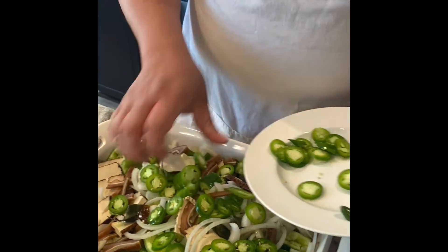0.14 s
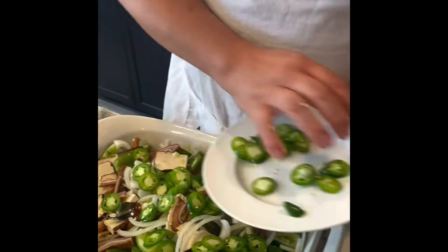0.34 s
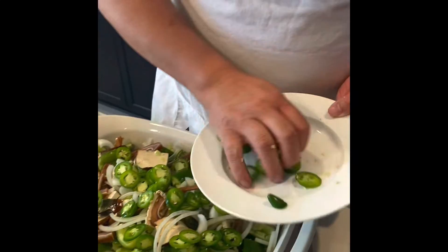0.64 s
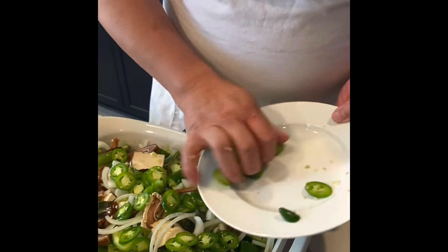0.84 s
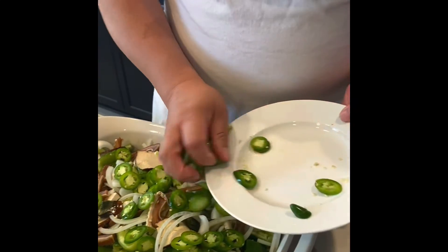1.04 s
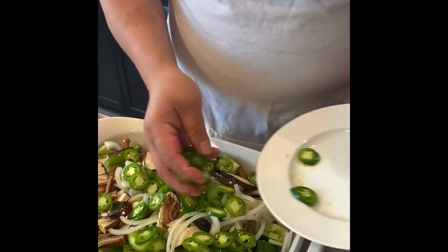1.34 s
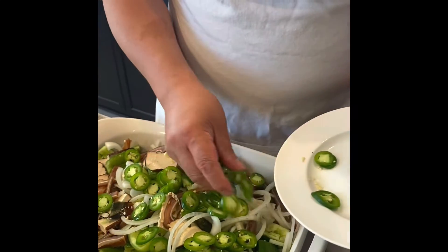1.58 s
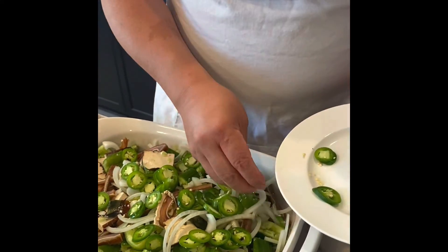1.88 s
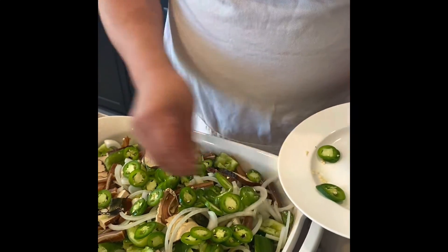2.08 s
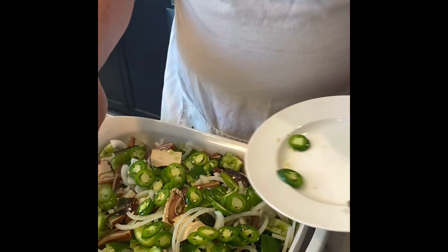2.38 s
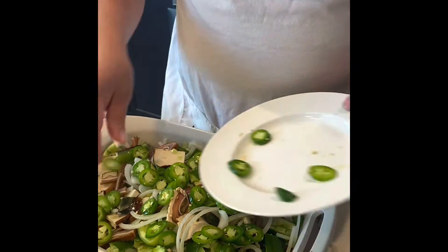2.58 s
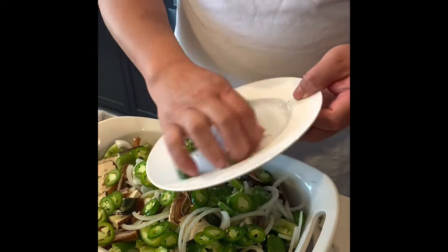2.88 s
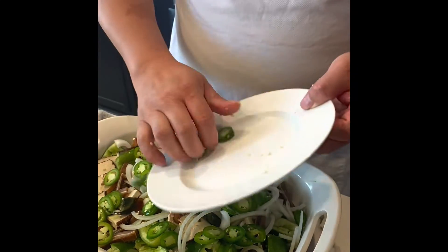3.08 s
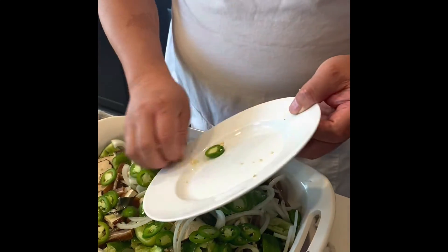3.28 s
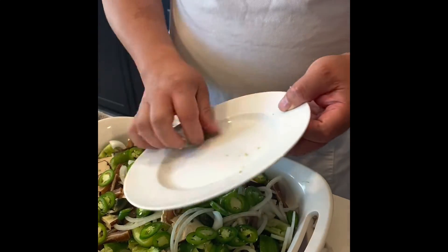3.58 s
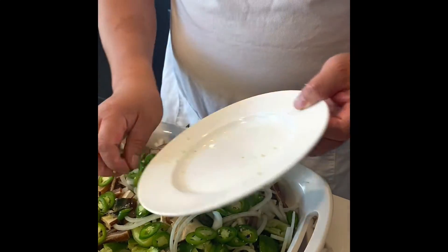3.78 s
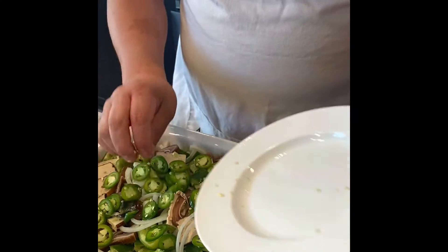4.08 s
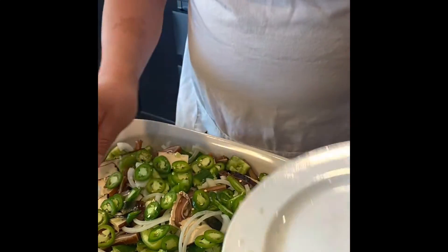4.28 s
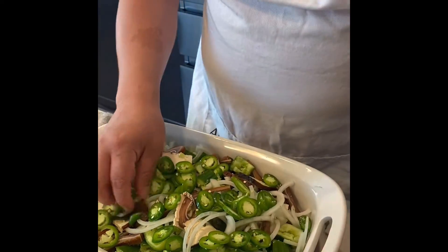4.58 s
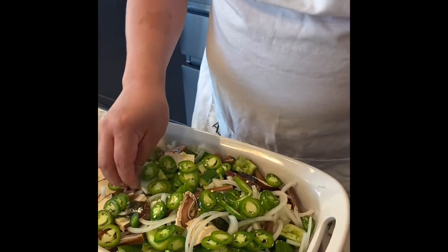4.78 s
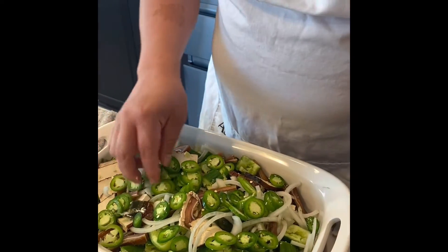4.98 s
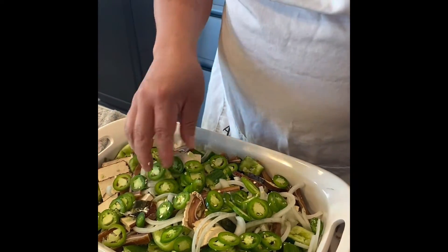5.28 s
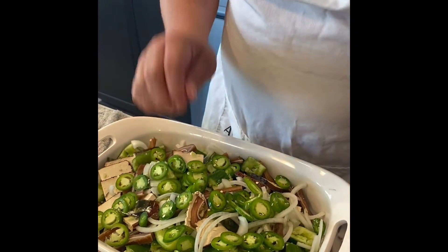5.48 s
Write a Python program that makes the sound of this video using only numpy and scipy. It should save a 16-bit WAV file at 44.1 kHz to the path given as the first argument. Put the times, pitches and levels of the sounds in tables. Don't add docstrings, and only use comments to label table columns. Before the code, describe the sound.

Light ceramic ticks and faint rubbing as food is swept off a hand-held plate, then one hard knock and a rattle as it is set down.

```python
import sys
import numpy as np
from scipy import signal
from scipy.fft import rfft, irfft, next_fast_len
from scipy.io import wavfile

SR = 44100
rng = np.random.default_rng(int(sys.argv[2]) if len(sys.argv) > 2 else 0)


def dump_mix(stems):
    frames = np.atleast_2d(stems).T
    limited = np.clip(frames, -1, 1)
    pcm = np.round(limited * 32767).astype(np.int16)
    wavfile.write(sys.argv[1], SR, pcm)


def gain_from_db(level_db):
    decades = np.asarray(level_db, float) / 20
    return 10 ** decades


N = 248724

PLATE_HZ = [1750, 2439, 2513, 2730, 3700, 3737, 3786, 3830, 4365, 4710, 5300, 5420, 5500, 5765, 6720, 7050,
            7750, 8275, 10300, 10900, 12000, 13000, 14900, 15700]
# level in the hand/dB, t60 in the hand/s, level on the counter/dB, t60 there/s, left lead/rad
PLATE_RING = [(-10, 0.14, -13, 0.32, 0.48), (-4, 0.069, -13, 0.038, 2.5), (-4, 0.037, 2, 0.034, 0.47),
              (-5.5, 0.2, -6.5, 0.17, 1.17), (-5.5, 0.1, -2, 0.054, 0.94), (-18, .08, -7, 0.069, 1.3),
              (-9, 0.086, -2.5, 0.1, 3.86), (-23, 0.057, -2, 0.072, 1.4), (-7.5, 0.033, -11, 0.098, 0.33),
              (-10, 0.086, -29, .1, 1.8), (-8.5, 0.036, -13, .1, 4.5), (-11, 0.088, 11.5, 0.041, 2.2),
              (-6.5, 0.04, -2, 0.083, 0.7), (-6.5, 0.078, 7, 0.036, 0.41), (-12.5, 0.087, -5.5, 0.12, 0.87),
              (-15, 0.059, -37, .06, 2.2), (-12, 0.11, -25.5, 0.093, 2.2), (-16, 0.061, -16.5, .12, 0.68),
              (-25, .06, -29, 0.1, 2.8), (-32, .05, -18, .12, 4.3), (-17, 0.031, -19.5, 0.084, 1),
              (-36, .05, -18.5, 0.079, 3.55), (-54, 0.063, -32, .1, 1.6), (-54, .04, -38, .14, 1.6)]
FAMILY_EDGES = [2200, 3200, 5000]
SCATTER_DB, SCATTER_RAD = 2.0, 0.35


def ticks():
    # t/s, peak level/dB, drive of the lowest mode/dB, of the next three/dB, of all higher ones/dB
    touches = [(0.314, -64.5, -14, 5, -18), (0.3424, -46.5, -28, -16, -12), (0.4401, -34, -12, -5, -6),
               (0.531, -31.5, -29, -37, -15), (0.652, -31.5, -8, -6, -6), (0.7566, -50.5, -5.5, -15, -11),
               (0.9588, -37, -30, -3, -9), (1.096, -53.5, -6, -22, -4.5), (1.1708, -52, -4, -11.5, -22),
               (2.477, -53.5, -3, -23, -15), (2.8405, -33.5, -17, -24, -17.5),
               (2.8704, -43, -9.5, -24, -12), (3.1493, -47.5, -7.5, -12, -3),
               (3.1705, -36.5, -20, -31, -15), (3.2, -42, -22, -19, -19), (3.2315, -39, -6, -7, -11),
               (3.3604, -54.5, -24, -7, -13), (3.578, -33.5, -22, -24, -17.5), (3.592, -38.5, -20, -12, -9),
               (3.645, -45.5, -33, -31, -8), (3.7199, -48, -23, -16, -7.5), (3.7529, -45, -9, -22, -13),
               (3.774, -47, -21, -24, -11), (4.8699, -49, -5, -14, -11.5)]
    # t/s, factor on t60
    grip = [(.3, 1.2), (.44, 0.85), (.66, 0.9), (.96, 0.2), (1.17, 1.5), (2.85, 1.1), (3.15, 1.26),
            (3.24, 0.94), (3.6, 0.73), (3.78, 1.14)]
    times, peaks_db = np.transpose(touches)[:2]
    out = cracks(times, peaks_db - 10, hz=2460, spread=3.0, decay_s=0.0013)
    chances = rng.standard_normal((len(touches), 2 * len(PLATE_RING)))
    for (s, peak_db, *family_db), luck in zip(touches, chances):
        freedom = np.interp(s, *np.transpose(grip))
        for k, (hz, (held_db, t60, _, _, lead)) in enumerate(zip(PLATE_HZ, PLATE_RING)):
            drive_db = family_db[np.searchsorted(FAMILY_EDGES[:2], hz)]
            level_db = peak_db + drive_db + held_db + 1 + 1.2 * SCATTER_DB * luck[k]
            phase_lead = lead + SCATTER_RAD * luck[-k - 1]
            add_mode(out, s, level_db, hz, t60 * freedom, phase_lead, rise_cycles=2.35)
        push_db = peak_db + family_db[0]
        add_mode(out, s, push_db + 5.5, 820, 0.03, -2.8, rise_cycles=0.57)
        add_mode(out, s, push_db + 4.5, 1250, 0.02, -2.1, rise_cycles=0.88)
    return out * gain_from_db([[-1.2], [1.2]])


def set_down():
    # t/s, counter knock level/dB, plate ring level/dB, extra ring of the middle modes/dB
    blows = [(4.9269, -30, -36, -1), (4.9370, -7.5, -24, 7), (4.946, -51, -37, 18), (4.9635, -30, -58, 2),
             (5.285, -45.5, -76.5, 0), (5.295, -46, -75, -10), (5.308, -41, -82, 3), (5.353, -54, -75, -3),
             (5.366, -37.5, -68, -7), (5.37, -35, -64.5, -1), (5.375, -23, -55, 12.5),
             (5.407, -28.5, -40, 3), (5.414, -14.5, -23.5, 0), (5.4534, -13.5, -20, -5.5),
             (5.4724, -16.5, -32.5, 4), (5.4765, -10, -16.5, -12), (5.485, -20.5, -18.5, -7),
             (5.493, -16, -28.5, 9.5), (5.5036, -11.5, -27.5, 9.5), (5.5083, -49, -26.5, -13.5)]
    # f/Hz, level/dB, t60/s, left lead/rad
    counter = [(897, -2.5, 0.032, -4.5), (959, -10.5, 0.063, 1.5), (1036, 5, 0.026, -2.5),
               (1107, -7.5, 0.064, -1.5), (1200, -11.5, 0.05, 3), (1338, 1.5, 0.017, 3.5),
               (1466, -18, 0.042, 5), (1630, -12.5, 0.04, 1), (1782, -9, 0.023, -5), (1886, -5, 0.018, 2),
               (2095, -18.5, 0.033, 0.7), (2230, 2.5, 0.0068, 11), (2690, -40, 0.0048, -7)]
    # f/Hz, level/dB, t60/s, left lead/rad
    cabinet = [(107.3, -2.5, 0.14, -0.33), (141, 2, 0.091, -0.7), (234.4, 1.5, 0.1, -0.32),
               (327, -0.5, 0.08, -0.6), (538, 7.5, 0.046, -1.7)]
    rocking_from_s, top_modes_hz = 5.2, 12500
    flat_top_db, rocking_top_db, flat_shine_db = -14, 12, 16.5

    times, knocks_db = np.transpose(blows)[:2]
    highs_db = -12 + 2 * knocks_db
    out = cracks(times, 1.57 * knocks_db + 1, hz=2540, spread=1.22, decay_s=0.00028)
    out += cracks(times, highs_db + 3, hz=5500, spread=1.37, decay_s=0.0017)
    out += cracks(times, 2.03 * knocks_db - 3.5, hz=2180, spread=1.87, decay_s=0.0073)

    chances = rng.standard_normal((len(blows), 50))
    for (s, knock_db, low_db, middle_db), high_db, luck in zip(blows, highs_db, chances):
        dull_db = 0.45 * (knock_db + 14.0)
        for k, (hz, level_db, t60, lead) in enumerate(counter):
            strength_db = knock_db + level_db + dull_db * np.log2(hz / 1000) + SCATTER_DB * luck[k]
            add_mode(out, s, strength_db, hz, t60, lead + SCATTER_RAD * luck[k + 1], rise_cycles=1.95)

        thud_db = -24 + 1.07 * knock_db
        for hz, level_db, t60, lead in cabinet:
            add_mode(out, s, thud_db + level_db, hz, t60, lead, rise_cycles=0.93)

        ring_db = low_db, low_db + middle_db, high_db
        for k, (hz, (_, _, level_db, t60, lead)) in enumerate(zip(PLATE_HZ, PLATE_RING)):
            family_db = ring_db[np.searchsorted(FAMILY_EDGES[1:], hz)]
            if s > rocking_from_s:
                family_db += rocking_top_db * (hz > top_modes_hz)
            else:
                family_db += flat_top_db * (hz > top_modes_hz)
                family_db += flat_shine_db * (7400 < hz < 11500)
            strength_db = family_db + level_db + SCATTER_DB * luck[-k - 1]
            phase_lead = lead + SCATTER_RAD * luck[-k - 2]
            add_mode(out, s, strength_db, hz, t60, phase_lead, rise_cycles=10.9)
    return out * gain_from_db([[-1.3], [1.3]])


def snaps():
    # t/s, peak level/dB, centre f/Hz, decay/s
    releases = [(0.533, -46, 7040, 0.00081), (0.466, -42.5, 1130, 0.0006), (0.544, -50, 1500, 0.00052),
                (0.753, -47, 1280, 0.0005), (0.945, -44.5, 9600, 0.0071), (0.974, -47, 7100, 0.0015),
                (1.6172, -57, 12000, 0.0016), (1.84, -55, 5970, 0.0022), (3.645, -59, 6000, .001),
                (3.659, -46, 5500, 0.0011), (3.6825, -39, 6000, 0.0016), (3.688, -58, 11000, 0.0048),
                (4.2294, -62, 12000, 0.0012), (4.586, -56, 5000, 0.0013)]
    return sum(cracks([s], [peak_db], hz, spread=1.42, decay_s=decay_s)
               for s, peak_db, hz, decay_s in releases)


def drag():
    # start t/s, hold/s, level/dB
    strokes = [
        (.35, 0.033, -76.5),
        (.78, .22, -71.5),
        (1.2, 0.31, -81),
        (1.98, .06, -73.5),
        (2.83, 0.35, -70),
        (3.28, .06, -68),
        (3.76, 0.021, -85),
        (4.25, 0.9, -75.5),
    ]
    grit = rng.standard_normal((2, N)) * held(gain_from_db(4.5 * drift(25.0)))
    out = np.zeros((2, N))
    for hz, (held_db, t60, *_) in zip(PLATE_HZ[:15], PLATE_RING):
        radius = gain_from_db(-60 / (t60 * SR))
        out += gain_from_db(held_db) * resonate(grit, hz, radius) * hz * np.sqrt(1 - radius)
    return swells(strokes, rise=73, fall=31.5) * rms_one(out)


def swish():
    # start t/s, hold/s, first f/Hz, last f/Hz, level/dB
    slides = [
        (0, 0.035, 5820, 5980, -72),
        (0.246, 0.12, 2450, 2900, -78),
        (.3, .05, 5300, 5600, -80),
        (1.17, 0.12, 4120, 4080, -68.5),
        (2.056, 0.17, 4120, 4120, -75),
        (2.68, 0.26, 4120, 4270, -71),
        (4.05, 0.101, 5920, 5710, -72),
        (4.416, 0.17, 5750, 5730, -84),
        (4.591, 0.085, 4040, 3990, -66.5),
        (5.219, 0.21, 5330, 5850, -73.5),
    ]
    out, t = np.zeros((2, N)), np.arange(N) / SR
    low_pass = signal.butter(2, 230, fs=SR, output="sos")
    band = rms_one(signal.sosfilt(low_pass, rng.standard_normal((2, 2, N))))
    for s, hold, first_hz, last_hz, level_db in slides:
        span = slice(round(max(s - 0.3, 0) * SR), round((s + hold + 0.3) * SR))
        pitch = np.interp(t[span], [s, s + hold], [first_hz, last_hz])
        phase = 2 * np.pi * np.cumsum(pitch) / SR
        gain = swells([(s, hold, level_db)], rise=108.5, fall=108.5)[span]
        out[:, span] += gain * (band[0][:, span] * np.cos(phase) + band[1][:, span] * np.sin(phase))
    return out


def rustle():
    # t/s, level/dB
    activity = [(0.0, -74.5), (0.12, -72), (0.24, -80.5), (0.44, -68.5), (0.56, -75), (0.88, -65),
                (1.03, -71), (1.21, -70), (1.54, -74.5), (1.66, -88), (1.86, -68.5), (2.12, -66.5),
                (2.5, -72.5), (2.9, -66.5), (3.45, -72.5), (4.1, -68), (4.4, -71.5), (5.64, -70)]
    # f/Hz, level/dB per Hz
    body_colour = [(900, -10), (1300, 5), (1900, 3), (2500, 4.5), (3200, 2), (4000, 4), (4800, -16.5),
                   (5800, 9), (6800, -13.5), (8600, -14)]
    # f/Hz, level/dB per Hz
    sheen_colour = [(5000, 1), (7000, 1.5), (9000, -5), (11000, -3.5), (12500, -19), (14200, -8),
                    (15500, -5), (16600, -14)]
    # start t/s, hold/s, level/dB
    passes = [(.08, 0.03, -82), (.4, 0.091, -71.5), (.65, .03, -81), (.87, 0.078, -70.5),
              (1.07, 0.23, -73.5), (1.53, 0.018, -78), (1.86, 0.028, -76), (2.08, 0.064, -77.5),
              (2.29, .05, -78.5), (2.74, 0.14, -74.5), (3.17, 0.14, -78.5), (3.62, 0.12, -71.5),
              (4.52, 0.15, -72), (4.83, 0.081, -77), (5.3, .2, -90)]
    level_db = np.interp(np.arange(N) / SR, *np.transpose(activity)) + 3
    body = gain_from_db(level_db) * coloured(body_colour, patchy_db=1.1, rate=6.0)
    sheen = gain_from_db(4) * coloured(sheen_colour, patchy_db=2.2, rate=14.0)
    return body + sheen * swells(passes, rise=213, fall=168)


def kitchen(hits):
    # f/Hz, t60/s, level/dB
    decay = [(153, 0.24, 1.5), (543, 0.32, 2), (960, 0.42, -14), (1950, 0.44, -11), (3980, 0.47, -13.5),
             (8100, 0.36, -3), (15000, 0.11, -17)]
    t = np.arange(SR // 2) / SR
    tail = np.zeros((2, len(t)))
    for hz, band in bands(76.2, 17000, size=len(t)):
        tail += gain_from_db(at_hz(decay, hz, column=2) - 60 * t / at_hz(decay, hz)) * band
    tail = tail * (1 - np.exp(-t / 0.00052)) * gain_from_db(-32.5)
    return signal.fftconvolve(tail, hits[1:], axes=1)[:, :N]


def hum():
    # f/Hz, width/Hz, rms level/dB
    room_modes = [(34.9, 1.9, -85.5), (75.1, 9.1, -60.5), (121.52, 4.5, -58), (155.6, 5, -68.5),
                  (190.1, 5.5, -70.5), (239.6, 34, -71.5), (289.3, 3.5, -71)]
    out = np.zeros((2, N))
    for hz, width_hz, level_db in room_modes:
        noise = rng.standard_normal((2, N + SR))
        mid, side = resonate(noise, hz, np.exp(-np.pi * width_hz / SR))[:, SR:]
        out += gain_from_db(level_db) * rms_one(ports(mid, side, hz))
    return out


def room_air():
    # f/Hz, level/dB per Hz
    air_colour = [(12, -50), (20, -13.5), (66, -4.5), (120, -1), (171, -12.5), (290, -12), (395, -15.5),
                  (514, -13), (978, -24.5), (1160, -20.5), (4100, -56.5), (4840, -60.5), (6000, -61.5),
                  (7800, -49), (13200, -120)]
    return gain_from_db(-56.0) * coloured(air_colour[1:-1], patchy_db=1.68, rate=6.6)


def add_mode(out, s, level_db, hz, t60, lead, rise_cycles):
    start = round(s * SR)
    audible_s = np.clip((level_db + 105) / 60, 0, 1.1) * t60
    t = np.arange(min(int(audible_s * SR), N - start)) / SR
    shape = gain_from_db(level_db - 60 * t / t60) * (1 - np.exp(-t * hz / rise_cycles))
    out[:, start:start + len(t)] += shape * np.sin(2 * np.pi * hz * t + lead * np.array([[0.5], [-0.5]]))


def cracks(times, levels_db, hz, spread, decay_s):
    out, size = np.zeros((2, N)), SR // 40
    noises = rng.standard_normal((len(times), 2, size))
    for s, level_db, noise in zip(times, levels_db, noises):
        out[:, round(s * SR):][:, :size] += gain_from_db(level_db) * burst(size, noise, hz, spread, decay_s)
    return out


def burst(size, noise, hz, spread, decay_s):
    t = np.arange(size) / SR
    sos = signal.butter(3, [hz / spread, min(hz * spread, 16500)], "band", fs=SR, output="sos")
    puff = signal.sosfilt(sos, ports(*noise, hz) * t * np.exp(-t / decay_s))
    return puff / np.abs(puff).max()


def resonate(x, hz, radius):
    return signal.lfilter([1, 0, -1], [1, -2 * radius * np.cos(2 * np.pi * hz / SR), radius ** 2], x)


def coloured(spectrum, patchy_db, rate):
    together = drift(rate / 4)
    out = np.zeros((2, N))
    for hz, band in bands(spectrum[0][0], spectrum[-1][0], size=N):
        flicker_db = patchy_db * (0.6 * together + drift(rate))
        out += held(gain_from_db(at_hz(spectrum, hz) + flicker_db)) * band
    return rms_one(out)


def bands(low_hz, high_hz, size):
    edges = low_hz * 2 ** np.arange(0, np.log2(high_hz / low_hz), 1 / 3)
    white = rng.standard_normal((2, 2, size))
    for k, (low, high) in enumerate(zip(edges, edges[1:])):
        sos = signal.butter(2, [low, high], "band", fs=SR, output="sos")
        mid, side = signal.sosfilt(sos, white[k % 2])
        centre = np.sqrt(low * high)
        yield centre, ports(mid, side, centre)


def ports(mid, side, hz):
    # f/Hz, correlation
    likeness = [(20, 0.79), (60, 1), (100, 1), (150, 0.86), (290, 0.71), (640, -0.82), (1410, 0.1),
                (3100, 0.037), (6820, -0.32), (15000, -0.2)]
    alike = np.clip(at_hz(likeness, hz), -0.99, 0.999)
    return np.sqrt(1 + alike) * mid + np.sqrt(1 - alike) * side * np.array([[1], [-1]])


def swells(rows, rise, fall):
    t = np.arange(0, N + 40, 40) / SR
    levels_db = [db - rise * np.maximum(s - t, 0) - fall * np.maximum(t - s - hold, 0)
                 for s, hold, db in rows]
    return held(gain_from_db(np.max(levels_db, axis=0)))


def drift(rate):
    r = np.exp(-80 * np.pi * rate / SR)
    return rms_one(signal.lfilter([1], [1, -2 * r, r * r], rng.standard_normal(N // 40 + 2001))[2000:])


def held(coarse):
    return np.repeat(coarse, 40)[:N]


def at_hz(points, hz, column=1):
    points = np.array(points)
    return np.interp(np.log(hz), np.log(points[:, 0]), points[:, column])


def rms_one(x):
    return x / np.sqrt(np.mean(x ** 2) + 1e-20)


def scene():
    hits = ticks() + set_down() + snaps()
    drone = room_air() + hum()
    drone[0] = np.roll(drone[0], 3)
    return hits + drag() + swish() + rustle() + kitchen(hits) + drone


def band_limit(x):
    return signal.sosfilt(signal.butter(12, 16990, fs=SR, output="sos"), x)


def record(dry):
    # f/Hz, level/dB
    left_over_right = [(60, -0.5), (110, -1.0), (200, -1.0), (380, -3.0), (700, -2.0), (1290, 0.5),
                       (2380, 0.5), (4400, -1.5), (8120, 0.0), (15000, 0.0)]
    # f/Hz, level/dB
    shared_treble = [(18, -9), (34, 2), (6500, -0.5), (7300, -6.5), (7900, -11.5), (8600, -13),
                     (11800, -10), (12800, -2), (16000, 2.5)]
    size = next_fast_len(N)
    hz = np.maximum(np.arange(size // 2 + 1) * SR / size, 1)
    rounded = 1.184 * np.tanh(dry / 1.203)
    tilt = gain_from_db(at_hz(left_over_right, hz) * np.array([[0.5], [-0.5]]))
    left, right = rfft(rounded, size) * tilt * (hz < 16000)
    mid = (left + right) / 2 * gain_from_db(at_hz(shared_treble, hz))
    side = (left - right) / 2
    mix = irfft(np.array([mid + side, mid - side]), size)[:, :N]
    return band_limit(mix)


dry = scene()
out = record(dry)
dump_mix(out)
```